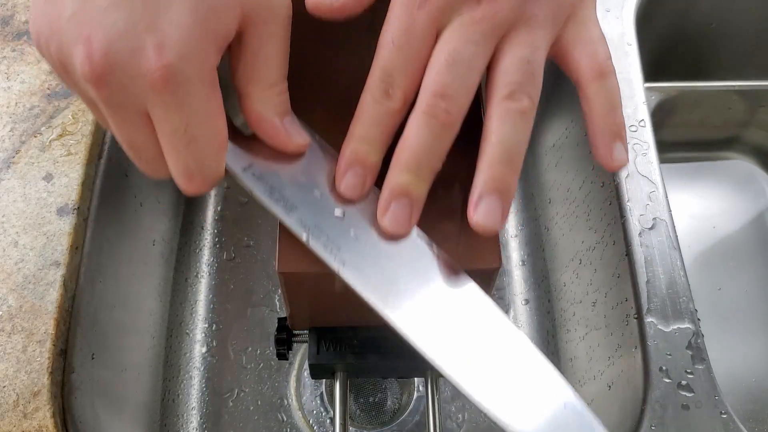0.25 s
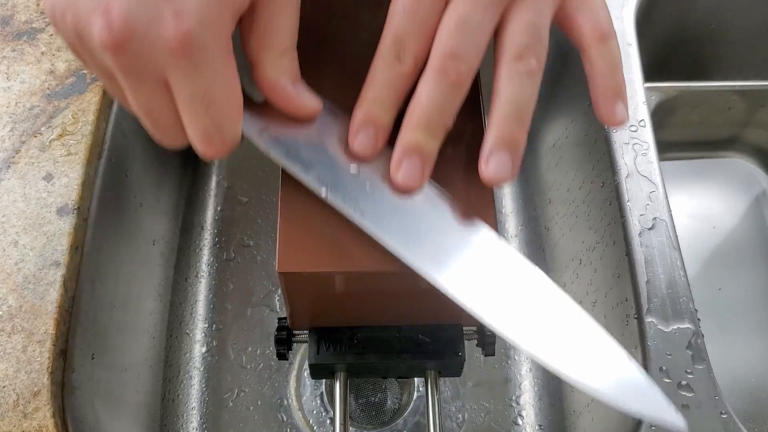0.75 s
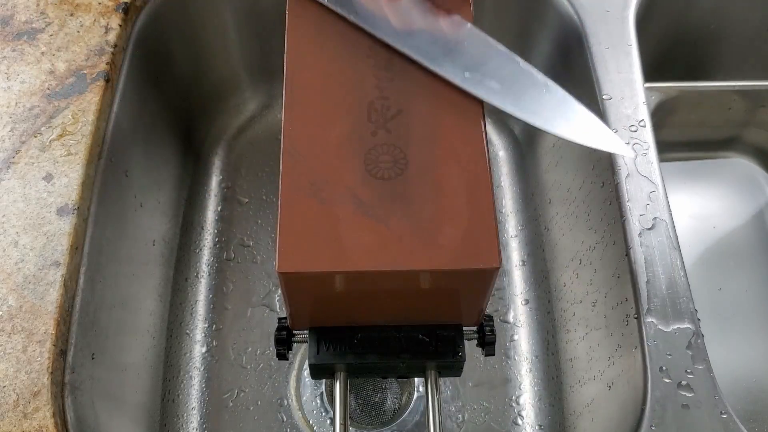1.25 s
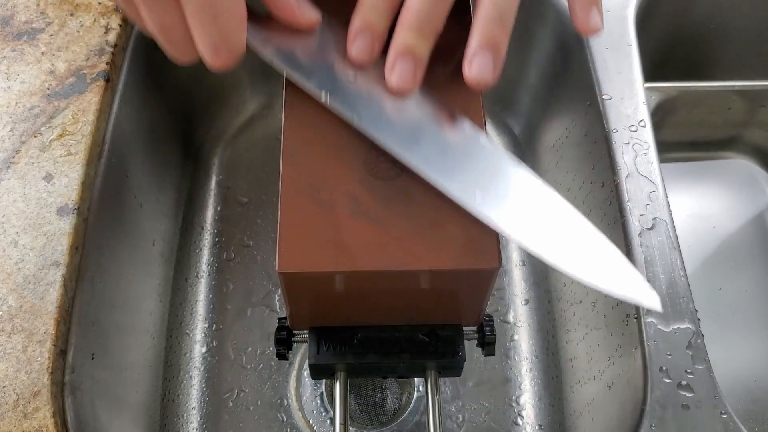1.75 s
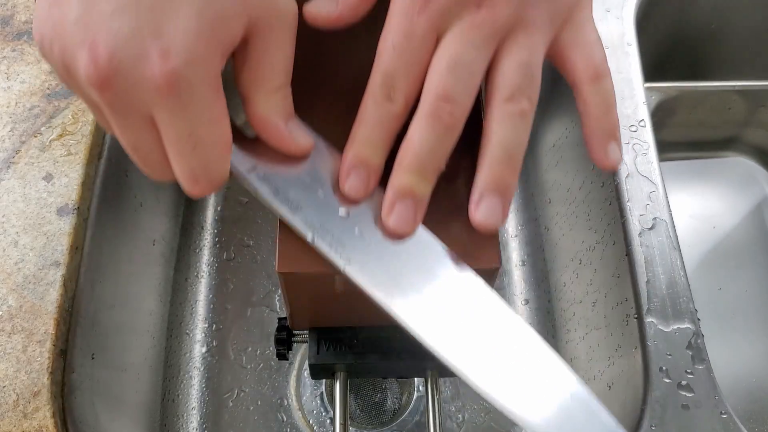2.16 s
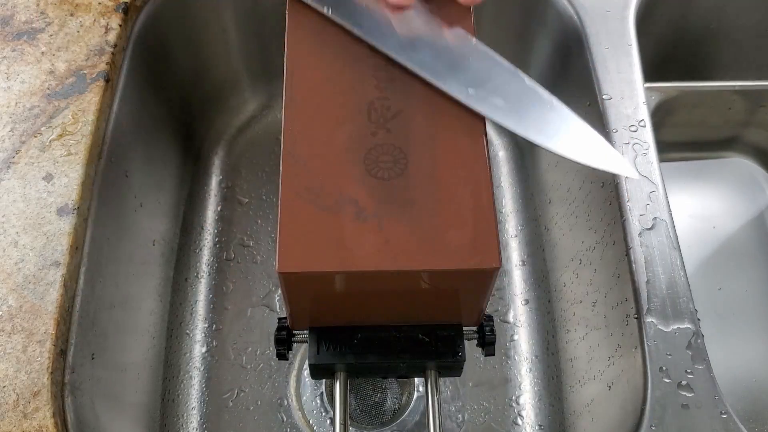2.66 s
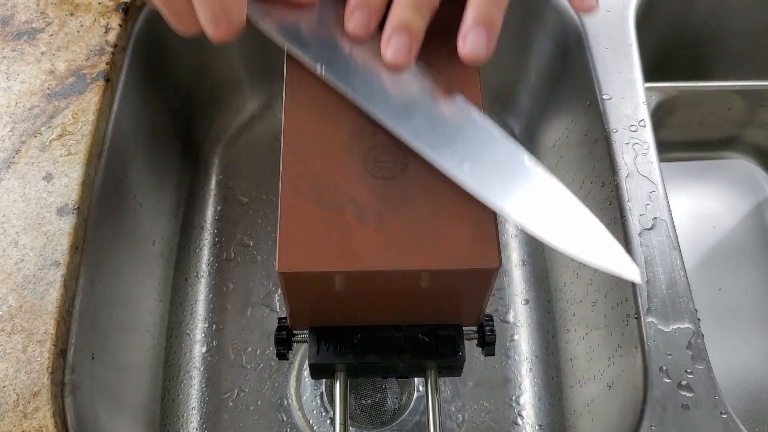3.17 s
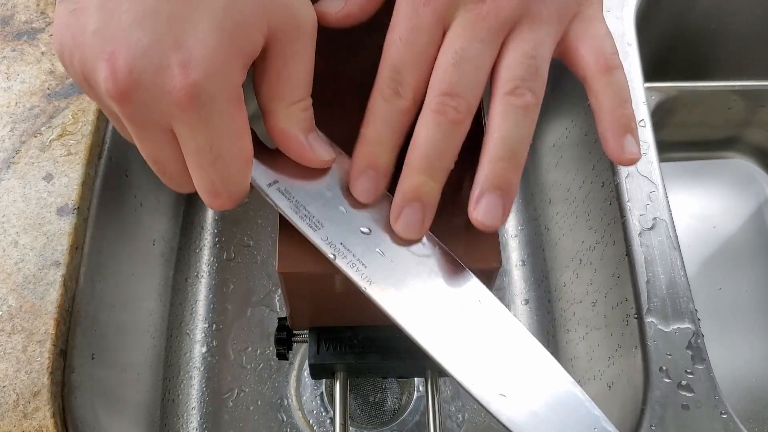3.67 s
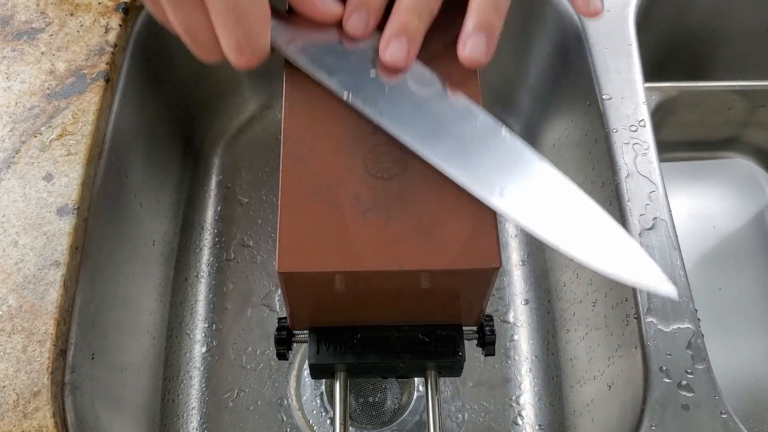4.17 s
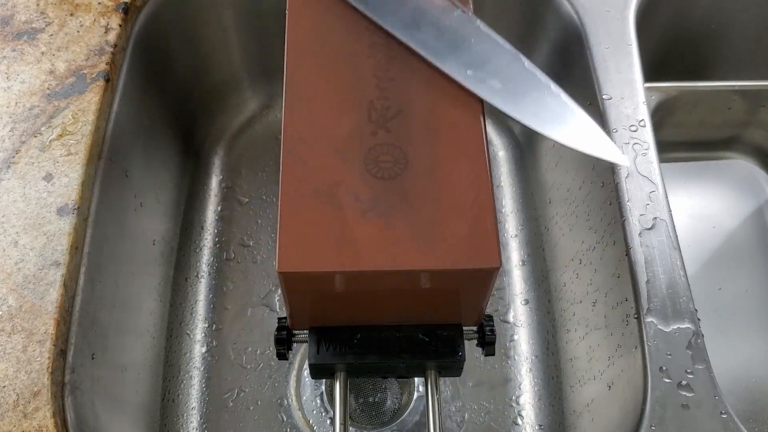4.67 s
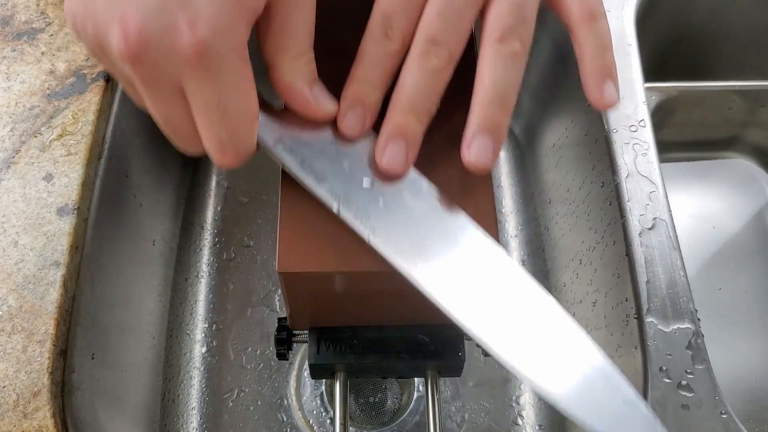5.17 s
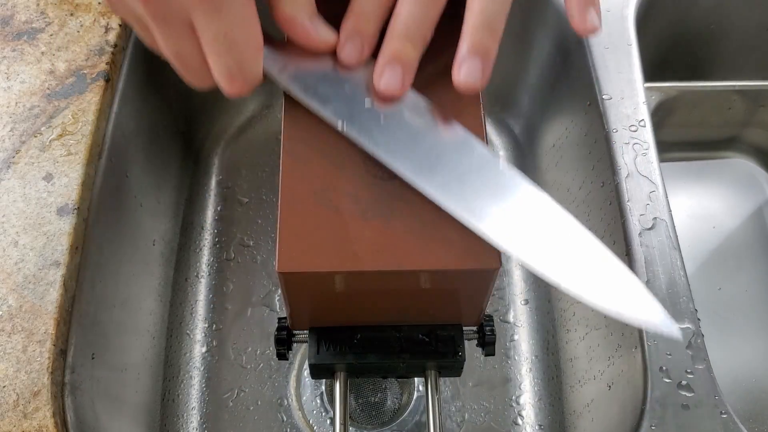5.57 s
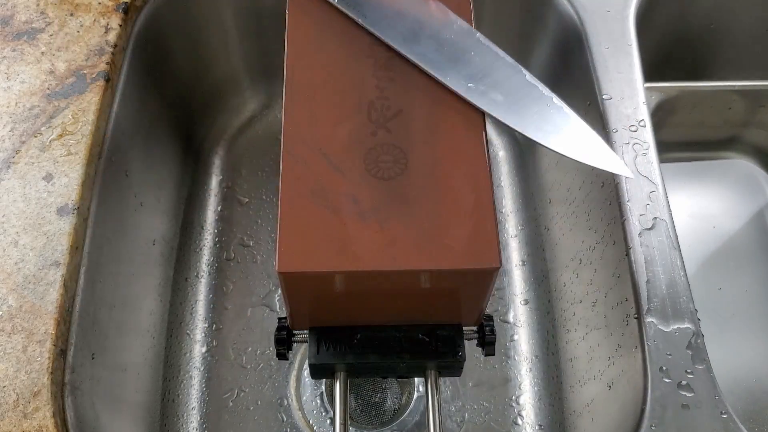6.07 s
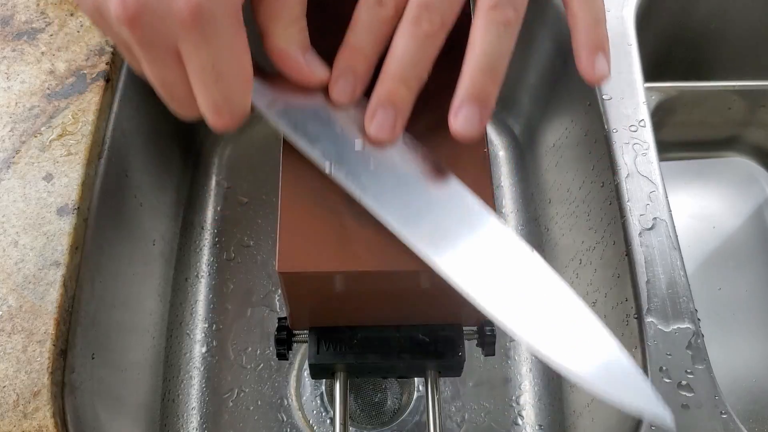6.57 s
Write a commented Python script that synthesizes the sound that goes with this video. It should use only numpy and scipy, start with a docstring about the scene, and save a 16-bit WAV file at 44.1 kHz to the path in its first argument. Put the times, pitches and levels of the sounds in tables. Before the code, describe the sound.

A knife is drawn back and forth over a wet whetstone at about three strokes a second. Each stroke is a gritty hiss with a light ring from the blade, almost stopping at every turn. Some pulls end in a faint squeak, and the edge now and then catches on coarse grains. The stone holder knocks softly and the steel sink rumbles faintly. The microphone is close above, in a quiet kitchen.

```python
"""A knife on a wet whetstone, set in a holder across a steel kitchen sink; one microphone close above.
It opens in mid-pull: grit tears at the edge and rings the blade, whose modes change along the stone.
At each turn the scrape all but stops and the sink rumbles; the holder sometimes knocks softly.
From about 1 s to 4 s the edge catches on coarse grains, and some pulls end in a faint squeak.
Towards the end the grip has moved along the blade and its low ring sinks, at three strokes a second."""
import sys
import numpy as np
from scipy import signal
from scipy.fft import rfft, irfft, next_fast_len
from scipy.io import wavfile
from scipy.ndimage import uniform_filter1d, map_coordinates

SR = 44100
rng = np.random.default_rng(int(sys.argv[2]) if len(sys.argv) > 2 else 0)


def digitize_waveform(pressure):
    """Quantize a signal to 16-bit integers and store it at the path in sys.argv[1].

    Rows of a 2-D input are taken as channels; values are limited to [-1, 1].
    """
    field = np.atleast_2d(pressure).T
    bounded = np.clip(field, -1, 1)
    quanta = np.round(bounded * 32767).astype(np.int16)
    wavfile.write(sys.argv[1], SR, quanta)


N = 300762
TIME = np.arange(N) / SR

# Place runs from 0 at the near end of the stone to 1 at the far end. Table levels are relative.
# Strokes, pull and push by turns, the first from the far end (start t/s, near bite/dB, far bite/dB,
# steepness as a power of place, body/dB, ring/dB, blade flex/dB, sink shake/dB, time stuck/s)
STROKES = [(-0.12, -29, -14, 3, 1, -1, -47, -67.7, 0.0),
           (0.236, -27.5, -12, 6.2, 0.5, 4.5, -48.5, -61, 0.021),
           (0.579, -29, -13, 1.9, -0.7, -2.5, -46.5, -67, 0.0081),
           (0.921, -26.0, -15.5, 9.4, 5.5, 1.5, -46.5, -59.0, 0.011),
           (1.258, -28, -15, 4.2, -1, -0.5, -46.5, -57, 0.01),
           (1.619, -29.1, -7.5, 23, -0.6, 5, -50, -77, 0.02),
           (1.948, -28.5, -18, 1.54, 1.3, -1.3, -47.5, -57, 0.0094),
           (2.311, -27.5, -16, 3.7, 2.5, 2.2, -47.0, -61, 0.016),
           (2.651, -28.5, -17, 2.75, 0.1, -1.8, -47.2, -62, 0.012),
           (3.017, -28, -11.5, 11.4, 3.5, 2.5, -47.5, -67.6, 0.002),
           (3.346, -30.5, -15, 3.1, -0.3, -2.5, -49.3, -71.9, 0.019),
           (3.721, -30, -11.5, 18, -8.5, 0.6, -53.5, -62, 0.015),
           (4.077, -30, -17, 3, 0, 1.3, -49.5, -68.3, 0.013),
           (4.435, -26.5, -9, 2.35, 3, 2.1, -49, -72, 0.0027),
           (4.755, -29.5, -10.5, 6.3, 3.3, 1.2, -48, -57.5, 0.0),
           (5.12, -26, -9.5, 2.37, 4, -1.5, -48.5, -62.6, 0.016),
           (5.45, -30, -14, 4.7, 3, 1.5, -48.5, -60, 0.0097),
           (5.818, -27, -16.5, 1.3, 1, 1.5, -48, -63.3, 0.016),
           (6.15, -29.5, -14, 4.5, 0.5, -0.2, -48.5, -61.6, 0.0076),
           (6.491, -25, -11.5, 4.5, -0.8, -2, -50.5, -73, 0.015)]


def gain_of(db):
    """Decibels to amplitude."""
    return 10 ** (np.asarray(db) / 20)


def unit_rms(x):
    """Scales to rms 1."""
    return x / np.sqrt(np.mean(x ** 2) + 1e-20)


def value_at(points, hz):
    """Reads a table of (f/Hz, value), joined by lines on a log-frequency axis."""
    f, value = np.transpose(points)
    return np.interp(np.log(hz + 1), np.log(f + 1), value)


def add(mix, s, sound):
    """Mixes a sound in at time s."""
    part = mix[max(round(s * SR), 0):][:len(sound)]
    part += sound[:len(part)]


def coloured(x, spectrum):
    """Gives x a spectrum, at rms 1."""
    size = next_fast_len(N)
    gain = gain_of(value_at(spectrum, np.fft.rfftfreq(size, 1 / SR)))
    return unit_rms(irfft(rfft(x, size) * gain, size)[:N])


def wander(hz):
    """Random drift of rms 1, up to the given rate."""
    lowpass = signal.butter(3, hz, fs=SR, output="sos")
    drift = signal.sosfiltfilt(lowpass, rng.standard_normal(N + 2 * SR), padtype="even")
    return unit_rms(drift[SR:-SR])


def resonate(x, hz, width_hz):
    """A steep resonance that follows the curve hz."""
    carrier = np.exp(2j * np.pi * np.cumsum(hz) / SR)
    r = np.exp(-np.pi * width_hz / SR)
    return (carrier * signal.lfilter([(1 - r) ** 2], [1, -2 * r, r * r], x / carrier)).real


def causal(gain):
    """Adds the phase that makes resonances ring after a blow and not before it."""
    log_gain = np.log(np.concatenate([gain, gain[-2:0:-1]]) + 1e-6)
    return np.exp(signal.hilbert(log_gain, axis=0).conj()[:len(gain)])


def room_tone(level_db=-65.5):
    """The quiet, steady air of the kitchen."""
    air_spectrum = [(25, -20), (60, -1), (110, -1.5), (300, -2.5), (600, -3.5), (1000, 1), (1600, -18.5),
                    (5000, -17), (15000, -28)]  # (f/Hz, level/dB)
    return gain_of(level_db) * coloured(rng.standard_normal(N), air_spectrum)


def reflections(x):
    """Sink and kitchen answer densely; the basin returns the low ring of the blade most strongly."""
    decay_times = [(200, 0.57), (700, 0.29), (2500, .22), (7000, 0.11), (15000, 0.082)]  # (f/Hz, t60/s)
    # reflected sound (f/Hz, level/dB)
    wet = [(200, -18), (650, -0.5), (1400, -11.5), (3000, -7.5), (8000, -13), (15000, -9)]
    hz, t, noise = signal.stft(rng.standard_normal(SR // 2), SR, nperseg=256)
    decay = gain_of(-60 * t / value_at(decay_times, hz)[:, None])
    energy = np.mean(decay ** 2, axis=1, keepdims=True) * (SR // 2)
    decay *= gain_of(value_at(wet, hz))[:, None] / np.sqrt(energy)
    response = signal.istft(noise * decay, SR, nperseg=256)[1]
    return signal.fftconvolve(x, response)[:N]


def sink_rumble(jolt_db=-1.5, sliding_db=-73, peak_s=0.044):
    """Each turn jolts the basin below the stone, which also booms faintly under the sliding."""
    basin_spectrum = [(25, -42), (45, -22), (60, -10), (74, -14), (83, 2.5), (94, -11), (125, -14),
                      (200, -21.5), (400, -37)]  # (f/Hz, level/dB)
    age = np.arange(SR // 2) / SR / peak_s
    shudder = (age * np.exp(1 - age)) ** 2
    level = np.full(N, gain_of(sliding_db))
    for s, *_, shake_db, _ in STROKES[1:]:
        add(level, s, gain_of(jolt_db + shake_db) * shudder)
    return level * coloured(rng.standard_normal(N), basin_spectrum)


def holder_knocks(level_db=2.0, rise_s=0.0057):
    """The stone shifts in its holder with soft thuds."""
    shifts = [(0.418, -53), (1.416, -53), (2.325, -52), (3.627, -52), (3.934, -49.5), (4.556, -51),
              (5.118, -50), (5.337, -51), (6.122, -52.5)]  # (t/s, level/dB)
    holder_modes = [(300, 2, 0.1), (218, -8, 0.098), (375, -4, .05)]  # (f/Hz, level/dB, t60/s)
    out, t = np.zeros(N), np.arange(SR // 4) / SR
    for s, db in shifts:
        ring = sum(gain_of(mode_db - 60 * t / t60) * np.sin(2 * np.pi * (hz * t + rng.random()))
                   for hz, mode_db, t60 in holder_modes)
        add(out, s, gain_of(db + level_db) * ring * (1 - np.exp(-t / rise_s)))
    return out


def squeaks(width_hz=35, rise_hz_per_s=500):
    """Late in a pull, friction feeds one mode, which rises as the free length of the blade shortens."""
    chirps = [(.16, 0.11, 1422, -37), (.855, 0.1, 1425, -43.5), (1.55, 0.08, 1425, -39.5),
              (2.225, 0.09, 1415, -36.5), (2.95, 0.12, 1430, -48.5), (5.78, 0.087, 1404, -45)]  # (middle t/s, length/s, f/Hz, level/dB)
    out = np.zeros(N)
    for s, length, hz, db in chirps:
        t = np.arange(-length, length, 1 / SR)
        ring = resonate(rng.standard_normal(len(t)), hz + rise_hz_per_s * t, width_hz)
        ring = ring[len(t) // 4:-len(t) // 4]
        add(out, s - length / 2, gain_of(db) * unit_rms(ring) * np.hanning(len(ring)))
    return out


def progress(rest_s=6.86):
    """Strokes done so far, as a number that grows smoothly."""
    turns = [row[0] for row in STROKES] + [rest_s]
    return np.interp(TIME, turns, np.arange(len(turns)))


def arm_swing(slide_near=0.029, slide_far=0.085):
    """The arm swings like a pendulum: place, velocity (pull positive) and sliding speed."""
    angle = np.pi * progress()
    place, pull = (1 + np.cos(angle)) / 2, np.sin(angle)
    sideways = slide_near * (1 - place) + slide_far * place  # a little slide remains at each turn
    return place, pull, np.hypot(pull, sideways)


def hand(settle_s=0.04):
    """The hand settles into each stroke: curves of near bite, far bite, steepness, body, ring, flex."""
    current = np.minimum(progress().astype(int), len(STROKES) - 1)
    return uniform_filter1d(np.array(STROKES)[current, 1:-2].T, round(settle_s * SR), axis=1)


def freedom(place, loudest, reach):
    """The stone supports the blade at a moving point, which frees or damps each mode."""
    return np.exp(-((place - loudest) / reach) ** 2 / 2)


def blade_bending(level_db=-5, stiffen=0.019, steady=0.23, speed_power=0.66,
                  waver_db=1.95, waver_per_s=18, wobble_hz=7):
    """The blade sings in its low modes, louder with speed; it is pressed a little sharper on the pull."""
    # narrow modes (f/Hz at place 0, width/Hz, level/dB, loudest place, reach in place,
    # extra on the pull/dB, relative pitch change from near to far)
    bending_modes = [(655.4, 34.6, 3.5, -0.09, 0.28, 4, -0.084), (590, 56, -6.5, 0.1, 0.32, -.5, 0.035),
                     (816.4, 66, -4.5, 0.59, 0.38, 1, 0), (1207, 74, -4.5, .45, 0.27, 4, -0.0063),
                     (1310, 99, -0.5, 0.72, 0.26, -4.5, -0.021), (1352, 134, 0, 0.1, 0.32, 0, 0.01),
                     (1425, 68, 2, 0.06, 0.16, 1.5, -0.1)]
    # the grip moves along the blade, so the modes sink and the lowest fades
    # (t/s, relative pitch change of the lowest mode, its level/dB)
    grip_drift = [(0, 0.018, 1), (2.5, 0, -0.5), (4.4, -0.026, -2), (6.8, -0.06, -1.5)]
    times, *columns = np.transpose(grip_drift)
    sag, fade_db = (np.interp(TIME, times, column) for column in columns)
    place, pull, speed = arm_swing()
    *_, flex_db = hand()
    lowest_hz, sound = bending_modes[0][0], np.zeros(N)
    # the grip matters most when the contact is at the near end; the unsteady hand wobbles the pitch
    shift_hz = lowest_hz * sag * (1 - place) + wobble_hz * wander(waver_per_s)
    for hz, width, db, loudest, reach, pull_db, glide in bending_modes:
        mode_db = db + pull_db * pull + fade_db * (hz == lowest_hz) + waver_db * wander(waver_per_s)
        mode_hz = hz * (1 + glide * place + stiffen * pull) + shift_hz
        ring = resonate(rng.standard_normal(N), mode_hz, width)
        # friction feeds weak swings and brakes strong ones
        ring /= (abs(uniform_filter1d(ring ** 2, size=400)) + 1e-12) ** (steady / 2)
        sound += gain_of(mode_db) * freedom(place, loudest, reach) * unit_rms(ring)
    return gain_of(level_db + flex_db) * speed ** speed_power * sound


def fractures(per_s=22000):
    """Grit breaks in a dense rain of tiny impulses of random size."""
    return rng.standard_normal(N) * (rng.random(N) < per_s / SR)


def edge_catches(level_db=-9.5, highpass_hz=2400):
    """The edge catches and a coarse grain snaps: a bright burst that dies in milliseconds."""
    snaps = [(.945, -22, 0.064), (1.273, -15, 0.023), (1.293, -18.5, .02), (1.641, -38, .03),
             (1.857, -9, 0.011), (1.957, -23, 0.028), (1.987, -7, 0.014), (1.995, -15, 0.026),
             (2.329, -25, 0.039), (2.662, -17, 0.023), (2.737, -12.5, 0.019), (3.373, -12.5, 0.033),
             (4.025, -8, 0.066), (4.063, -15, .015), (4.088, -22, .025)]  # (t/s, level/dB, t60/s)
    # colour of a snap (f/Hz, level/dB)
    spectrum = [(2600, -2), (4000, 4.5), (5000, -1), (6800, 3), (10000, -5), (15000, -5.5)]
    force, t = np.zeros(N), np.arange(SR // 10) / SR
    for s, db, t60 in snaps:
        add(force, s, gain_of(db - 60 * t / t60))
    burst = gain_of(level_db) * force * coloured(fractures(), spectrum)
    return signal.sosfilt(signal.butter(6, highpass_hz, "high", fs=SR, output="sos"), burst)


def bite(place, uneven_db=0.32, uneven_per_s=29):
    """Under an unsteady hand, the edge bites harder towards the far end of the stone (dB)."""
    # the edge digs in (+) or skates on slurry (-) for a moment (middle t/s, length/s, level/dB)
    digs_and_skates = [(0.431, 0.037, -9.5), (0.644, 0.052, -8), (0.832, 0.15, 5), (1.222, 0.059, 5.5),
                       (1.504, 0.1, 6.5), (1.862, 0.026, 7), (1.995, 0.033, 4), (2.03, 0.089, -6.5),
                       (2.519, 0.038, 6.5), (2.563, 0.112, -13.5), (2.623, 0.032, 2.9),
                       (2.718, 0.081, -4.5), (3.206, 0.21, -4.5), (3.265, 0.06, 5), (3.311, 0.026, -10),
                       (3.8, 0.24, 4), (4.006, 0.089, -6.5), (4.033, 0.045, 11), (6.624, 0.088, 5.5)]
    near_db, far_db, steepness, *_ = hand()
    bite_db = near_db + (far_db - near_db) * place ** steepness + uneven_db * wander(uneven_per_s)
    for s, length, db in digs_and_skates:
        add(bite_db, s - length / 2, db * np.hanning(round(length * SR)))
    return bite_db


def stiction(stuck_db=-3, breakaway_db=5, breakaway_s=0.024):
    """At most turns the edge sticks for an instant, then tears loose with a rasp that dies away (dB)."""
    level_db, t = np.zeros(N), np.arange(SR // 4) / SR
    for s, *_, stuck_s in STROKES:
        if stuck_s > .005:
            rasp_db = breakaway_db * np.exp((stuck_s - t) / breakaway_s)
            add(level_db, s, np.where(t < stuck_s, stuck_db, rasp_db))
    return level_db


def roughness(place, bite_db, slips_per_s=380, slip_depth=2.0, far_depth=6.6, relax_s=0.0015,
              crunch_depth=0.9, crunch_hz=1100):
    """The edge slips in small jerks that start sharply and relax, and crushes grit in tiny clumps."""
    # jerks follow at uneven intervals, each once enough strain has built up
    strain = np.cumsum(gain_of(5 * wander(slips_per_s))) * slips_per_s / SR
    jerks = np.diff(np.floor(strain), prepend=0) * rng.random(N) ** 2
    slips = np.tanh(2 * signal.lfilter([1], [1, -np.exp(-1 / (relax_s * SR))], jerks))
    slipping = (slip_depth + far_depth * place) * (slips - slips.mean())
    crunch = crunch_depth * wander(crunch_hz)
    # a light edge skips; a hard-pressed one grinds more evenly
    skipping = np.interp(bite_db, [-27, -18], [1, .62])
    return unit_rms(gain_of(skipping * (slipping + crunch)))


def weak_modes(place, hz, spacing_hz=120, span=0.1307, count=40):
    """Countless faint resonances, each heard over a short span of the stone: a ripple of rms 1."""
    field = rng.standard_normal((len(hz), count))
    grid = np.meshgrid(hz / spacing_hz, place / span, indexing="ij")
    return unit_rms(map_coordinates(field, grid, order=2, mode="mirror"))


def slurry_glints(shape, patch_db=1.6, frames=7, bins=19):
    """Slurry and tilt of the edge tint the hiss in brief, broad patches (dB)."""
    broad = uniform_filter1d(rng.standard_normal(shape), bins, axis=0)
    return patch_db * unit_rms(uniform_filter1d(broad, frames, axis=1))


def contact_power(f, place, pull, grit_db=-44.0, blade_db=-4.5):
    """Power spectrum of the contact: the hiss of the grit plus the blade's broad upper modes."""
    grit_spectrum = [(100, -54), (500, -44), (1000, -31), (1600.0, -17), (2300.0, -16.5), (4500.0, -4.5),
                     (6500.0, -0.6), (8500.0, -3), (10500.0, -4.5), (14000.0, -3), (15800.0, -13.5)]  # (f/Hz, level/dB)
    # broad modes (f/Hz at place 0, width/Hz, level/dB, loudest place (may lie off the stone),
    # reach in place, extra on the pull/dB, relative pitch change from near to far)
    upper_modes = [(1740, 150, -17.5, -0.33, 0.67, 0.7, -0.015),
                   (1934.0, 210, -16.5, -0.34, 0.65, 5, -0.055), (2150, 240, -15.5, 0.51, 0.36, 1.8, -0.02),
                   (2372, 170, -15.5, 0.6, 0.32, 1.9, 0.012), (2505, 270, -13.5, 1.51, 1, -1.5, 0.048),
                   (2715, 230, -11, 0.44, 0.32, 2, 0.033), (3037, 330, -17, 0.78, 0.96, 0.7, 0.16),
                   (3300, 170, -22.5, 0.37, 1, 4.5, 0.1), (3650, 130, -11.5, 1.29, 0.3, -1, -0.01),
                   (4370, 2200, -10.5, -0.41, 0.8, 3.5, -0.068), (5670, 200, -8.3, 0.26, 0.34, 1.5, -0.02),
                   (6211.0, 350, -13, 0.34, 1, 2, -0.046), (7200, 680, -8.5, 1.05, 0.32, 1.5, -0.041),
                   (7600, 1170, -7.5, 1.11, 0.86, 0.8, 0.06), (8520, 940, -8, -0.077, 0.78, 1, -0.01),
                   (12140, 1700, -8.5, 0.75, 0.2, 4, 0.066)]
    power = gain_of(grit_db + value_at(grit_spectrum, f)) ** 2
    for centre, width, db, loudest, reach, pull_db, glide in upper_modes:
        detune = 2 * (f - centre * (1 + glide * place)) / width
        strength = gain_of(blade_db + db + pull_db * pull) * freedom(place, loudest, reach)
        power = power + strength ** 2 / (np.pi * width) * (2 / (1 + detune ** 2)) ** 2
    return power


def scrape(creep_per_s=0.179, rock_db=1.5, rock_per_s=7, muffle=-1.5):
    """Fractures hiss and ring the upper modes in proportion to bite and speed."""
    place, pull, speed = arm_swing()
    bite_db = bite(place)
    grinding = unit_rms(roughness(place, bite_db) * fractures())
    force = grinding * speed * gain_of(bite_db + stiction())
    hz, t, spectra = signal.stft(force, SR, nperseg=1024, noverlap=768)
    f = hz[:, None]
    # each stroke has its own edge angle, and the blade rocks a little about it
    *_, body, ring, _ = hand()
    body, ring = (db + rock_db * wander(rock_per_s) for db in (body, ring))
    place, pull, body, ring = (np.interp(t, TIME, curve) for curve in (place, pull, body, ring))
    # the fingers press hardest early in the pull and muffle the ring
    ring += muffle * np.maximum(pull, 0) * place
    # the contact also creeps along the edge, so the faint resonances change from stroke to stroke
    ripple_db = value_at([(4000, 2.0), (12000, 1.7)], f)
    tint_db = ripple_db * weak_modes(place + creep_per_s * t, hz)
    tint_db += slurry_glints(spectra.shape)
    tint_db += body * value_at([(2000, 0.75), (2300, 0.046)], f)
    tint_db += ring * value_at([(2000, 0.045), (2300, 1), (3500, 0.74), (4400, 0)], f)
    tint_db += pull * value_at([(8500, 0.14), (10500, 0.88)], f)  # more fizz on the pull
    gain = np.sqrt(contact_power(f, place, pull) * SR / 2) * gain_of(tint_db)
    return signal.istft(spectra * causal(gain), SR, nperseg=1024, noverlap=768)[1][:N]


def scene():
    """Knife and stone close under the microphone, sink and kitchen behind them, in mono."""
    direct = scrape() + blade_bending() + squeaks() + edge_catches() + holder_knocks()
    return (direct + reflections(direct) + sink_rumble() + room_tone())[None]


def record(dry, cutoff_hz=15900):
    """The recorder's band limit."""
    lowpass = signal.firwin(401, cutoff_hz, window=("kaiser", 9), fs=SR)
    return signal.oaconvolve(dry, lowpass[None], "same")


dry = scene()
out = record(dry)
digitize_waveform(out)
```